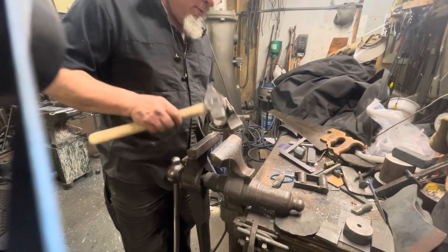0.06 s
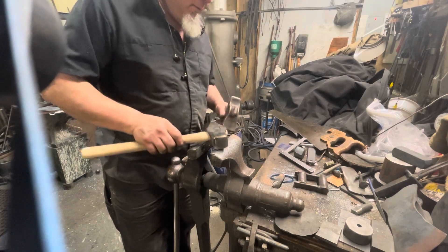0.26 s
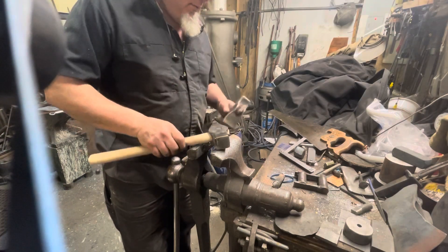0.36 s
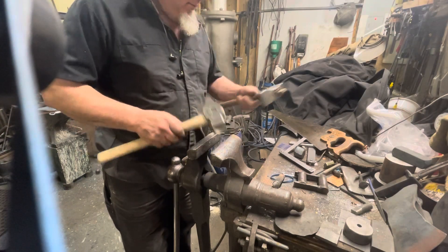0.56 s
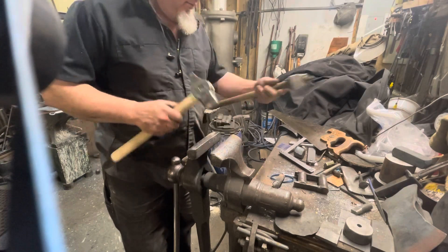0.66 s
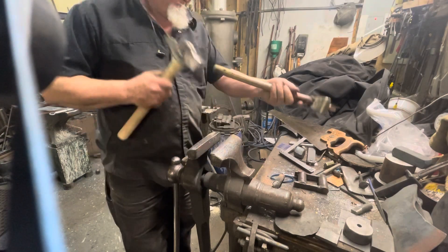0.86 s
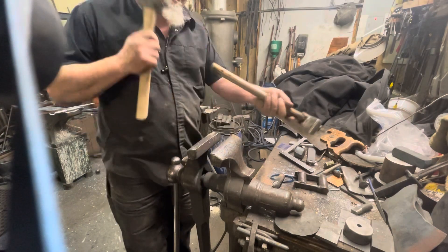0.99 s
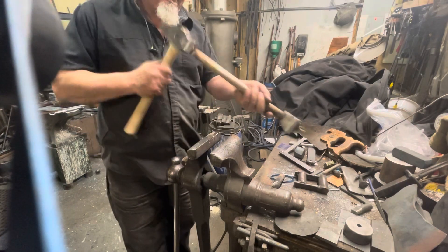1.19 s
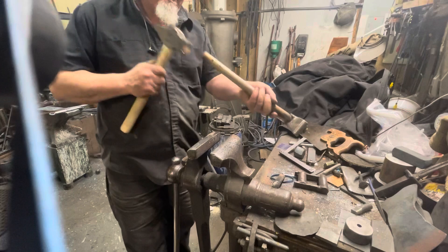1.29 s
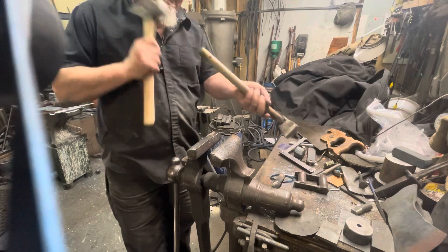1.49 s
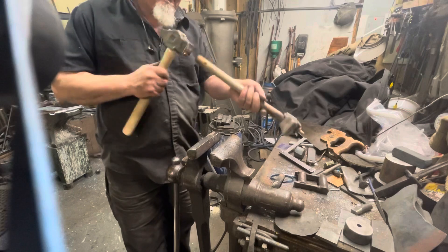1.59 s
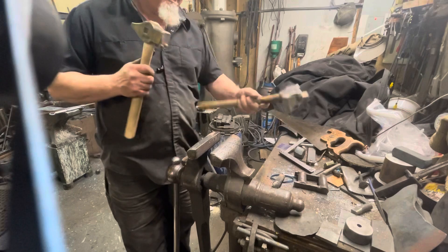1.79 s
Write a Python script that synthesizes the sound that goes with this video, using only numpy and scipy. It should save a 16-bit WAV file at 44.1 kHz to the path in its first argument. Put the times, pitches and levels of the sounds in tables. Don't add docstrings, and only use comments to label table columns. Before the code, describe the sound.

Hammer blows in a workshop, close up. Low hum, faint air and sleeve rustle open; at about 0.25 seconds a steel tool knocks the bench twice in quick succession, rattling with a short metallic ring. A small tick comes near 0.64. Sharp, loud woody hammer blows on a wedge land at 1.2 and 1.56, each with a tiny rebound and roughly half-second room ring; faint contacts and rustle follow.

```python
import sys
import numpy as np
from scipy import signal
from scipy.fft import rfft, irfft, next_fast_len
from scipy.io import wavfile

SR = 44100
rng = np.random.default_rng(int(sys.argv[2]) if len(sys.argv) > 2 else 0)


def to_linear_factor(level_db):
    exponent = np.asarray(level_db, float) / 20
    return 10 ** exponent


def wav_record(signal):
    frames = np.transpose(np.atleast_2d(signal))
    bounded = np.clip(frames, -1, 1)
    quanta = np.round(bounded * 32767).astype(np.int16)
    wavfile.write(sys.argv[1], SR, quanta)


N = 81585

# pitch_hz, level_db (rms), wobble_db, wander_rad, pan_db (left over right)
HUM_TONES = [
    (50, -50.5, 0, .1, 2.5),
    (237, -78.5, 6, 0.4, 2.5),
    (600, -81, 0, 0.26, 12),
]
# pitch_hz, density_db (per Hz)
AIR_SPECTRUM = [(38, -23), (65, -9), (186, -25.5), (499, -40), (547, -45), (586, -41), (1800, -45),
                (4820, -44), (15500, -55.5)]
AIR_DB = -64.5
# pitch_hz, likeness (0 to 1)
AIR_LIKENESS = [(50, 0.95), (200, .8), (600, 0.4), (3000, .1), (9000, .2), (13000, .9)]
# pitch_hz, density_db (per Hz)
RUSTLE_SPECTRUM = [(180, -55), (300, -11.5), (461, -12), (652, -17), (794, -13), (1330, -21), (1590, -19.5),
                   (9760, -27.5), (15500, -32.5)]
# start_s, level_db
RUSTLE_EFFORT = [(0, -61), (.1, -67), (.58, -65), (.65, -64), (.74, -61), (.8, -62), (1.0, -62),
                 (1.07, -70), (1.6, -67), (1.85, -59)]

# pitch_hz, t60_s
ROOM_T60 = [(100, 1), (300, 0.63), (700, 0.65), (1300, 0.69), (2500, 0.59), (5000, 0.53), (9000, 0.33),
            (14000, 0.11)]
# pitch_hz, likeness (-1 to 1)
WALL_LIKENESS = [(60, 0.8), (300, 0.63), (700, -0.08), (8000, -0.07), (10500, 0.1), (12000, .85)]
ROOM_BUILD_S, ROOM_LEFT_DB, WALL_DULL_HZ = 0.0025, 2, 9000
EARLY_DB, EARLY_T60_S = 5, 0.22

# start_s, level_db (peak), pan_db (left over right), snap_db
TICK_CONTACTS = [
    (0.641, -44, 1.5, -47),
]
# start_s, level_db (peak), pan_db (left over right), snap_db
STEEL_CONTACTS = [
    (.2455, -9, 3.5, -28),
    (.251, -10.5, 7.5, -38.5),
    (.259, -12, 6.5, -38.5),
    (.273, -4.5, 0, -24),
    (.280, -9, 10.5, -35.5),
    (.414, -35.5, 6, -60),
    (.449, -37.5, -2, -62),
]
# start_s, level_db (peak), pan_db (left over right), snap_db
HAMMER_CONTACTS = [
    (1.203, -4.5, 2.5, -17.5),
    (1.209, -14.5, 5, -38),
    (1.388, -38, 1, -69),
    (1.557, -4.5, 7, -18.5),
    (1.562, -14.5, 3, -34),
    (1.612, -28.5, -2, -59),
    (1.74, -40, 1, -72),
]
# pitch_hz, level_db, t60_s
STEEL_MODES = [(132, -29, 0.22), (193.7, -30, 0.14), (371, -23, 0.22), (546.7, -20.5, 0.78),
               (1342, -8.5, .07), (1570, -12, .04), (1672, -6.5, 0.099), (2072, 0, .13), (2163, -8.5, .13),
               (2300, -6, 0.037), (2830, -23, 0.023), (6950, -13, 0.035), (11930, -28, .22),
               (12800, -20, 0.011)]
# pitch_hz, level_db, t60_s
WOOD_MODES = [(421, -13, 0.083), (637.6, -2.5, 0.071), (758, -6, 0.062), (970, -4, 0.105),
              (1081, -12.5, 0.2), (1173, -11, 0.11), (1213, -10.5, 0.2), (1275, -9, 0.22),
              (2068, -7.5, 0.046), (2320, -5, 0.035), (3000, -13.5, 0.023), (3899, -5.5, 0.076),
              (5060, -24, 0.0072), (6000, -22, 0.0096)]
# pitch_hz, density_db (per Hz)
STEEL_CRACK = [(76, -43), (130, -17), (595, -16.5), (1150, -10), (2410, -5), (7100, -24.5), (10400, -35),
               (12900, -33), (15500, -83)]
# pitch_hz, density_db (per Hz)
WOOD_CRACK = [(120, -40), (200, -14), (1010, 2.5), (2380, -3.5), (3180, -6.5), (6020, -8), (7480, -11.5),
              (12500, -24.5), (15500, -54)]
TICK_MIX = {"modes_db": -19.5, "crack_db": -3, "crack_s": 0.0022, "wet_db": 2, "slap_db": -12}
STEEL_MIX = {"modes_db": -13, "crack_db": -0.5, "crack_s": 0.011, "wet_db": -2, "slap_db": 7.5}
WOOD_MIX = {"modes_db": -15, "crack_db": 4.5, "crack_s": .004, "wet_db": 1, "slap_db": 14.5}
TWIN_SPREAD, TWIN_DB, TWIN_FROM_HZ = 0.025, -5, 1100
SNAP_S, SNAP_HZ = 0.0012, 8600

# pitch_hz, level_db
MIC = [(6800, 1), (7400, -8.5), (8000, -0.5), (9500, -0.5), (10600, -9.5), (12500, 3), (14500, -4.5),
       (16500, -42.5)]
# start_s, bass_dip_db, treble_dip_db, swell_db (swell level),
# swell_s (swell length)
DUCKS = [
    (0.2457, 10.5, -0.5, -24.5, 0.016),
    (.275, -9.5, 3, -8, 0.0093),
    (1.205, 10.5, 9, -20, .028),
    (1.558, 11, 10.5, -8, 0.021),
]
DUCK_ATTACK_S, DUCK_HOLD_S, DUCK_RELEASE_S, SPLIT_HZ = 0.025, 0.09, 0.12, 450
# pitch_hz, level_db
SWELL_TONES = [(1150, -7.5), (2400, -6), (3050, -8), (3800, -6), (5850, -0.5), (8000, -7)]
SWELL_LEFT_DB, SWELL_RISE_DB, SWELL_LAST_S, SWELL_LAST_DB = -3, 12.5, 0.003, 11
CLIP_TOP, CUTOFF_HZ = 1.3, 16100

BAND_EDGES_HZ = 25 * 2 ** np.arange(0, 9.4, 1 / 3)
OPPOSED = np.array([[1], [-1]])


def rms_one(x):
    return x / np.sqrt(np.mean(x ** 2) + 1e-20)


def at_hz(points, hz):
    return np.interp(np.log(hz), np.log(np.array(points)[:, 0]), np.array(points)[:, 1])


def filtered(x, order, edge_hz, kind):
    return signal.sosfilt(signal.butter(order, edge_hz, kind, fs=SR, output="sos"), x)


def colour(x, spectrum):
    size = next_fast_len(2 * x.shape[-1])
    hz = np.maximum(np.fft.rfftfreq(size, 1 / SR), 10)
    cepstrum = irfft(np.log(to_linear_factor(at_hz(spectrum, hz))), size)
    cepstrum[1:size // 2] *= 2
    cepstrum[size // 2 + 1:] = 0
    return irfft(rfft(x, size) * np.exp(rfft(cepstrum)), size)[..., :x.shape[-1]]


def drift(rate_hz):
    pole = np.exp(-80 * np.pi * rate_hz / SR)
    white = rng.standard_normal(N // 40 + 2002)
    slow = signal.lfilter([1], [1, -2 * pole, pole * pole], white)[2000:]
    return np.interp(np.arange(N) / 40, np.arange(len(slow)), rms_one(slow))


def stereo_bands(size, likeness):
    white = rng.standard_normal((2, 2, size))
    for k, (low, high) in enumerate(zip(BAND_EDGES_HZ, BAND_EDGES_HZ[1:])):
        hz = np.sqrt(low * high)
        mid, side = filtered(white[k % 2], 2, [low, high], "band")
        alike = at_hz(likeness, hz)
        yield hz, np.sqrt(1 + alike) * mid + np.sqrt(1 - alike) * side * OPPOSED


def hiss(spectrum, patchy_db):
    out, together = 0, drift(8)
    for hz, noise in stereo_bands(N, AIR_LIKENESS):
        flicker_db = patchy_db * (0.59 * together + drift(15))
        out = out + to_linear_factor(at_hz(spectrum, hz) + flicker_db) * noise
    return rms_one(out)


def air():
    return to_linear_factor(AIR_DB + 1.5 * OPPOSED) * hiss(AIR_SPECTRUM, patchy_db=1.1)


def hum():
    t, out = np.arange(N) / SR, 0
    for hz, level_db, wobble_db, wander_rad, pan_db in HUM_TONES:
        level = np.sqrt(2) * to_linear_factor(level_db + wobble_db * drift(6) + pan_db / 2 * OPPOSED)
        out = out + level * np.sin(2 * np.pi * hz * t + wander_rad * drift(6))
    return out


def rustle():
    start_s, level_db = np.transpose(RUSTLE_EFFORT)
    effort = to_linear_factor(np.interp(np.arange(N) / SR, start_s, level_db))
    hollow = filtered(rng.standard_normal(N), 2, [435, 475], "band")
    return effort * (hiss(RUSTLE_SPECTRUM, patchy_db=0.87) + to_linear_factor(-8.5) * rms_one(hollow))


def room():
    t, tail = np.arange(SR) / SR, 0
    for hz, noise in stereo_bands(SR, WALL_LIKENESS):
        late = to_linear_factor(-60 * t / at_hz(ROOM_T60, hz))
        early = to_linear_factor(EARLY_DB - 60 * t / EARLY_T60_S)
        tail = tail + (late + early) * noise
    tail = tail * (1 - np.exp(-(t / ROOM_BUILD_S) ** 2))
    return tail / np.sqrt(np.sum(tail ** 2) / 2) * to_linear_factor(ROOM_LEFT_DB * OPPOSED)


def with_twins(modes):
    return modes + [(hz * (1 + TWIN_SPREAD), db + TWIN_DB, t60_s) for hz, db, t60_s in modes
                    if hz > TWIN_FROM_HZ or hz < 200]


def ringing(modes, t):
    ring = 0
    for hz, level_db, t60_s in modes:
        stronger, sharper, turn = rng.normal(0, 1, 3)
        phase = min(hz / 700, 1.5) * turn * np.array([[1], [-1], [0]])
        decay = to_linear_factor(level_db + 2.53 * stronger - 60 * t / max(t60_s, 0.01))
        ring = ring + decay * np.sin(2 * np.pi * hz * t * (1 + 0.0025 * sharper) + phase)
    return ring * np.minimum(t / 0.00037, 1)


def crack(spectrum, crack_s, t):
    envelope = np.exp(-t / crack_s) * np.minimum(t / 0.00068, 1)
    burst = colour(rng.standard_normal((2, len(t))) * envelope, spectrum)
    burst[1] += filtered(burst[0] - burst[1], 4, 10500, "high")
    return burst / np.max(np.abs(burst))


def snap(t):
    click = filtered(rng.standard_normal(len(t)) * np.exp(-t / SNAP_S), 4, SNAP_HZ, "high")
    return click / np.max(np.abs(click))


def struck(contacts, modes, spectrum, shop, modes_db, crack_db, crack_s, wet_db, slap_db):
    out, t = np.zeros((3, N + SR)), np.arange(SR // 2) / SR
    slap = colour(1.0 * (t == 0), spectrum)
    slap = to_linear_factor(slap_db) * slap / np.max(np.abs(slap))
    modes = with_twins(modes)
    for start_s, level_db, pan_db, snap_db in contacts:
        i = int(start_s * SR)
        gain = to_linear_factor(level_db + pan_db * np.array([[0.5], [-0.5], [0]]))
        ring = to_linear_factor(modes_db) * ringing(modes, t)
        burst = to_linear_factor(crack_db) * crack(spectrum, crack_s, t)
        out[:, i:i + len(t)] += gain * (ring + np.vstack([burst, slap]))
        out[:2, i:i + len(t)] += to_linear_factor(snap_db) * snap(t)
    sent = filtered(out[2:, :N], 2, WALL_DULL_HZ, "low")
    return out[:2, :N] + to_linear_factor(wet_db) * signal.fftconvolve(shop, sent, axes=1)[:, :N]


def scene():
    shop = room()
    knocks = struck(STEEL_CONTACTS, STEEL_MODES, STEEL_CRACK, shop, **STEEL_MIX)
    blows = struck(HAMMER_CONTACTS, WOOD_MODES, WOOD_CRACK, shop, **WOOD_MIX)
    tick = struck(TICK_CONTACTS, STEEL_MODES, RUSTLE_SPECTRUM, shop, **TICK_MIX)
    return knocks + blows + tick + rustle() + air() + hum()


def swell(x, start_s, level_db, length_s):
    t, i = np.arange(int(length_s * SR)) / SR, int(start_s * SR)
    tones = 0
    for hz, tone_db in SWELL_TONES:
        level = to_linear_factor(tone_db + rng.normal(0, 3, (2, 1)))
        tones = tones + level * np.sin(2 * np.pi * hz * t + rng.uniform(0, 4.5, (2, 1)))
    mix = tones + 0.43 * rng.standard_normal(tones.shape)
    last = to_linear_factor(SWELL_LAST_DB) * np.exp((t - length_s) / SWELL_LAST_S)
    grow = (to_linear_factor(SWELL_RISE_DB * (t / length_s - 1)) + last) * np.minimum(t / 0.005, 1)
    head = x[:, i:i + SR // 100]
    spread = signal.fftconvolve(head[:, ::-1], (grow * mix)[:, ::-1], axes=1)[:, ::-1][:, :len(t)]
    spread = spread / np.max(np.abs(spread)) * np.max(np.abs(head))
    out = np.zeros_like(x)
    out[:, i - len(t):i] = to_linear_factor(level_db + SWELL_LEFT_DB * OPPOSED) * spread
    return out


def low_pass(x):
    return signal.sosfilt(signal.butter(12, 16300, fs=SR, output="sos"), x)


def record(dry):
    t, heard = np.arange(N) / SR, colour(dry, MIC)
    bass_db, treble_db, ahead = 0, 0, 0
    knots_s = np.cumsum([0, DUCK_ATTACK_S, DUCK_HOLD_S, DUCK_RELEASE_S])
    for start_s, bass_dip_db, treble_dip_db, swell_db, swell_s in DUCKS:
        dip = np.interp(t - start_s, knots_s, [0, 1, 1, 0])
        bass_db = bass_db - bass_dip_db * dip
        treble_db = treble_db - treble_dip_db * dip
        ahead = ahead + swell(heard, start_s, swell_db, swell_s)
    bass = signal.sosfiltfilt(signal.butter(2, SPLIT_HZ, fs=SR, output="sos"), heard)
    mix = to_linear_factor(bass_db) * bass + to_linear_factor(treble_db) * (heard - bass) + ahead
    rounded = CLIP_TOP * np.tanh(mix / CLIP_TOP)
    finished = signal.sosfilt(signal.cheby2(12, 60, CUTOFF_HZ, fs=SR, output="sos"), rounded)
    return low_pass(finished)


dry = scene()
out = record(dry)
wav_record(out)
```